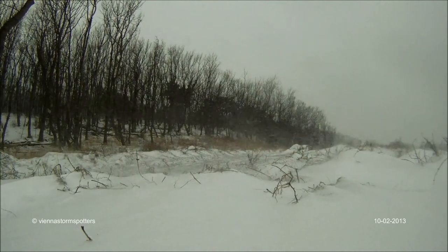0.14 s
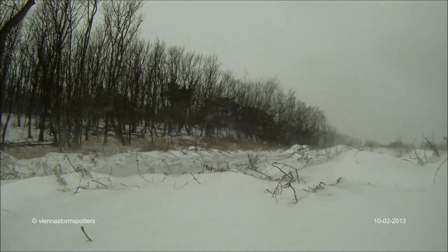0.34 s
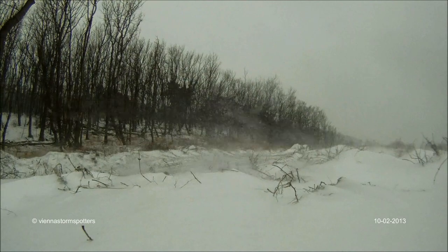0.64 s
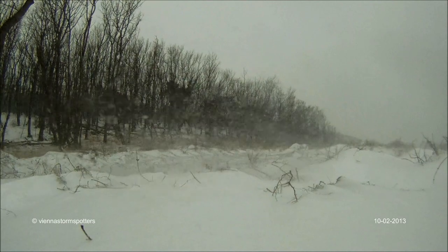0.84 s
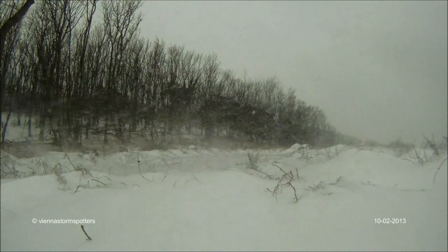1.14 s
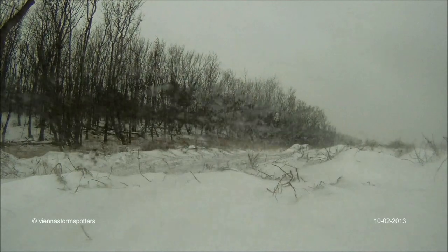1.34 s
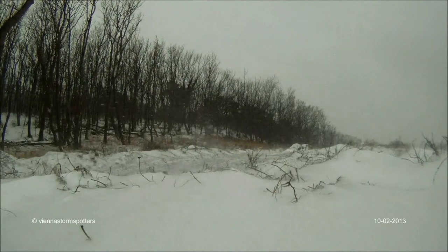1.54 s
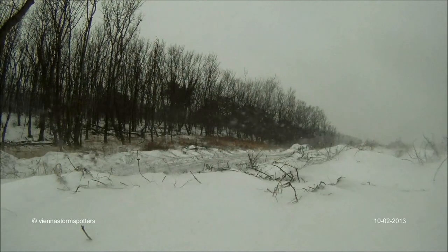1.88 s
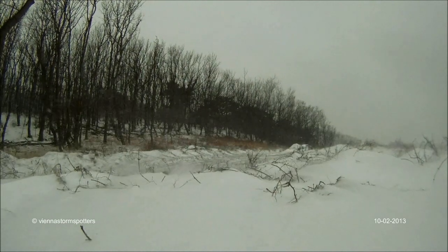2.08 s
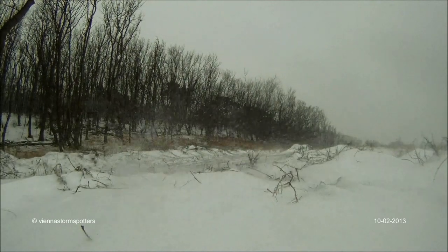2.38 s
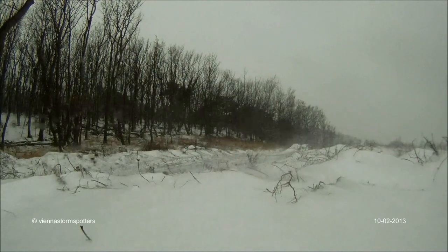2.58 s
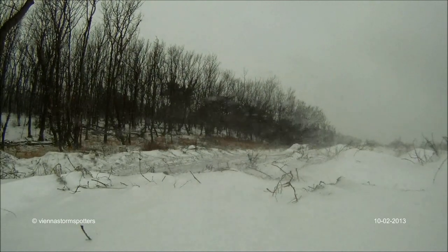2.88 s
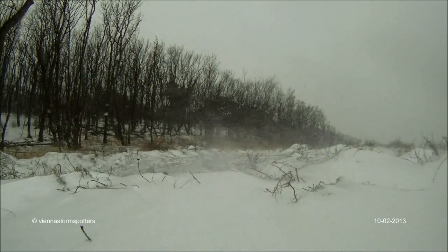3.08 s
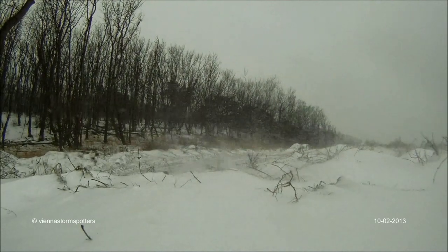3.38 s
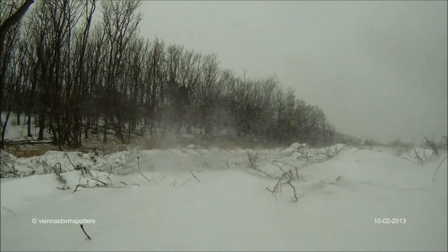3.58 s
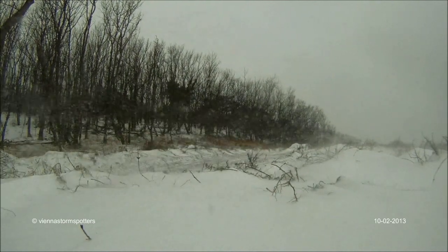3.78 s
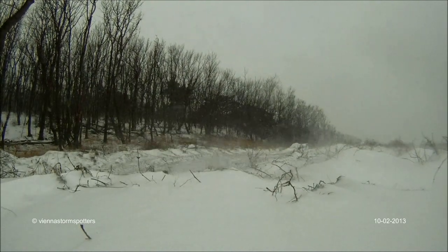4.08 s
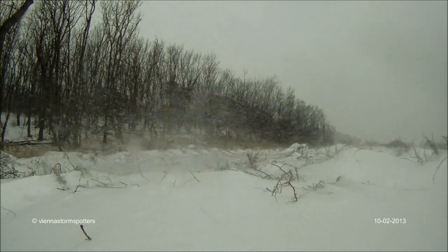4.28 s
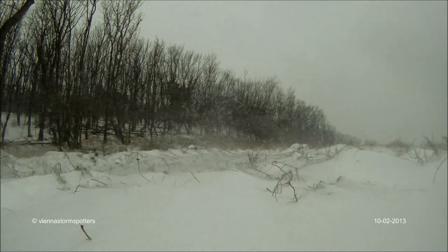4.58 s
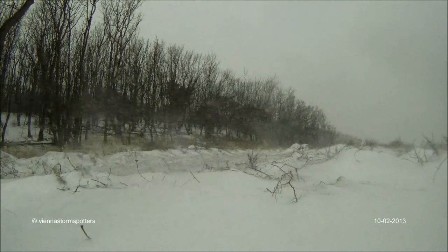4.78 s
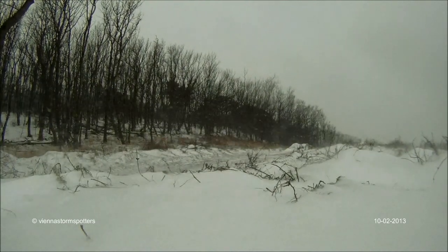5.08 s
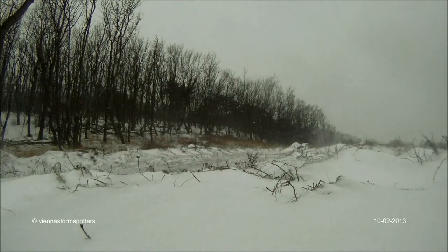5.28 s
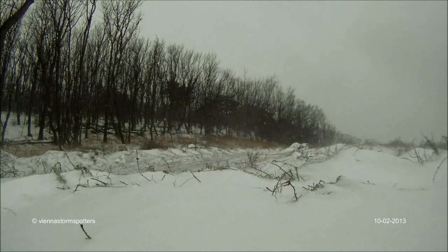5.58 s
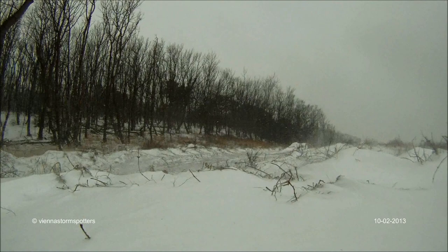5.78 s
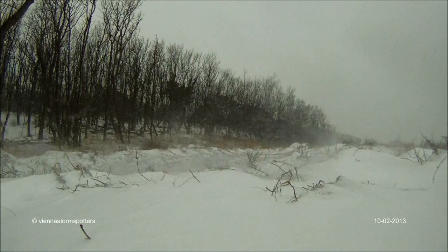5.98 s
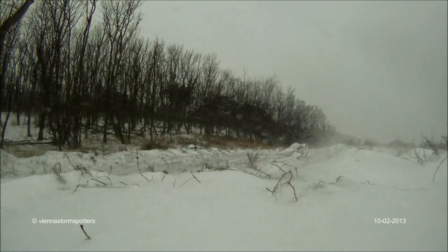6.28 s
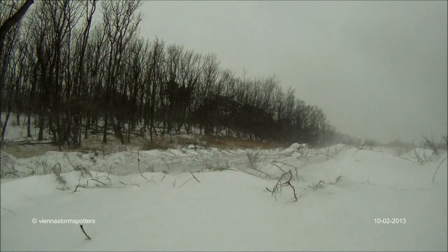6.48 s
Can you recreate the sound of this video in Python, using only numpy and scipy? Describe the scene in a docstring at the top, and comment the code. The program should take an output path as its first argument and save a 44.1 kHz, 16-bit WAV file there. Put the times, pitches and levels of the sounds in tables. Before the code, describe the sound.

Blowing snow rushes and fizzes against the microphone in uneven surges, over the rumble and hollow roar of gusty wind in an open field. Ice grains strike close up with sharp ticks and crackles. The wind dips briefly twice, drops for about a second late on, leaving faint taps of snow, and then returns with a few more ticks.

```python
"""Snowstorm in an open field.

A turbulent stream blows straight at a microphone in a small housing. Eddies rumble on its
port, the air roars past, and gusts of drifting snow excite the resonances of the housing,
which rush and fizz. Now and then a hard ice grain strikes the microphone with a tick."""
import sys
import numpy as np
from scipy import signal
from scipy.fft import rfft, irfft
from scipy.io import wavfile

SR = 44100
rng = np.random.default_rng(int(sys.argv[2]) if len(sys.argv) > 2 else 0)


def to_wav(s):
    """Save 16-bit WAV."""
    ch = np.atleast_2d(s).T  # columns
    pcm = np.round(np.clip(ch, -1, 1) * 32767)  # PCM
    wavfile.write(sys.argv[1], SR, pcm.astype(np.int16))


N = 292824
TIME = np.arange(N) / SR
HZ = np.fft.rfftfreq(N, 1 / SR)


def gain_of(db):
    """The decibel scale: 20 dB is a factor of ten in amplitude."""
    return 10 ** (np.asarray(db) / 20)


def unit_rms(x):
    """Normalisation to a mean power of 1."""
    return x / np.sqrt(np.mean(x ** 2) + 1e-20)


def swell(centre_s, length_s):
    """A Gaussian envelope, length_s wide at 1/e of its peak."""
    return np.exp(-np.minimum((2 * (TIME - centre_s) / length_s) ** 2, 20))


def spectrum(points):
    """A magnitude response, interpolated in decibels over log frequency."""
    hz, db = np.transpose(points)
    return gain_of(np.interp(np.log(HZ + 1), np.log(hz), db))


def resonances(modes):
    """The magnitude response of steep-sided resonances whose powers add."""
    powers = (gain_of(db) ** 2 / (1 + ((HZ - hz) / width) ** 2) ** np.pi for hz, width, db in modes)
    return np.sqrt(sum(powers))


def colour(x, gain):
    """Minimum-phase filtering is causal, so resonances ring after each impact; the result has rms 1."""
    log_gain = np.log(np.maximum(gain, 1e-5))
    phase = -signal.hilbert(np.r_[log_gain, log_gain[-2:0:-1]]).imag[:len(HZ)]
    return unit_rms(irfft(rfft(x) * np.exp(log_gain + 1j * phase), N))


def noise(gain):
    """Spectral shaping of white noise, at rms 1."""
    return colour(rng.standard_normal(N), gain)


def flutter(rate_hz):
    """Random modulation: band-limited noise that wavers up to about rate_hz."""
    return noise(HZ / (HZ + 8) / (1 + (HZ / rate_hz) ** 2))


def grains(per_s, spread_db):
    """Shot noise: independent impacts, many small and a few large."""
    size = gain_of(spread_db * np.minimum(rng.exponential(1, N), 4.5))
    return unit_rms(size * rng.choice([-1, 1], N) * (rng.random(N) < per_s / SR))


def pelting(level_db, per_s, spread_db, crowding):
    """Rate-modulated shot noise: impacts come thicker as the level rises, at constant mean power."""
    rate = np.minimum(per_s * gain_of(crowding * (level_db - np.median(level_db))), SR)
    return grains(rate, spread_db) / np.sqrt(rate / per_s)


def hiss(level_db=-64):
    """White noise lays a faint, even floor under the lulls."""
    return gain_of(level_db) * rng.standard_normal(N)


# Low response of the housing to flakes and powder: frequency_hz, gain_db
RUSH_SPECTRUM = [(600, -21.5), (1000, -17), (1250, -9), (1430, 0), (1540, -1), (1700, -6), (1900, -2),
                 (2110, 1), (2350, -6), (2600, -13), (2950, -22), (4000, -29), (6000, -48.5)]
# High resonances of the housing under the same impacts: centre_hz, width_hz, gain_db
FIZZ_MODES = [(9500, 410, -9), (9920, 330, 2.5), (10500, 235, -1.5), (11130, 570, -19), (12750, 450, -24),
              (13460, 260, -2.5), (14150, 340, -1), (15000, 740, -13.5)]

def flake_taps(level_db=-51, per_s=25, fizz_db=-10):
    """Impulse response: single flakes ring the housing, and stand out when the masking wind drops."""
    hits = grains(per_s, spread_db=0.5)
    rush = colour(hits, spectrum(RUSH_SPECTRUM))
    fizz = gain_of(fizz_db) * colour(hits, resonances(FIZZ_MODES))
    return gain_of(level_db) * (rush + fizz)


# Grains that skid along the housing: centre_s, highest_rms_db
SKIDS = [(5.535, -41), (5.715, -44), (5.794, -48), (5.852, -37.5)]
# Resonances of their thin squeak: centre_hz, width_hz, gain_db
SKID_MODES = [(5150, 330, 1), (6900, 450, -3)]

def skids(length_s=0.0076):
    """Friction noise: short scrapes excite two high resonances."""
    envelope = sum(gain_of(db) * swell(centre_s, length_s) for centre_s, db in SKIDS)
    return envelope * noise(resonances(SKID_MODES))


# Strength of the wind: time_s, level_db
WIND = [(0, 2.5), (0.78, 0.57), (0.85, -5.7), (1.03, 2.5), (1.72, -1), (2.27, -2.5), (2.65, 2.5),
        (3.2, -0.5), (3.97, -1.45), (4.34, -4.5), (4.38, -9), (4.49, 0.34), (5.18, 3), (5.45, -9),
        (6.15, -11), (6.26, -0.7), (6.64, -1.5)]

def wind_strength():
    """Unsteady flow, in dB: the wind blows hard, dips twice, sinks into a long lull and picks up."""
    time_s, level_db = np.transpose(WIND)
    return np.interp(TIME, time_s, level_db)


# Big eddies that buffet the housing: centre_s, length_s, rumble_lift_db, roar_lift_db
BUFFETS = [(0.12, 0.3, 5, 4.5), (0.45, 0.22, 3.7, 2.5), (0.83, 0.17, 4.5, 9), (1.01, 0.14, 1.5, -0.5),
           (1.51, 0.28, 2.5, 2.5), (1.944, 0.14, 4, 5), (2.18, 0.33, 5.5, 6.5), (2.59, 0.33, 1, 4),
           (2.86, 0.073, 2.5, -1), (3.09, 0.079, 2, 0.5), (3.42, 0.18, 3, 2.5), (3.617, 0.14, -1, 4.5),
           (3.78, 0.16, 4, 1.5), (4.683, 0.12, 2.8, 0.5), (5.7, 0.11, 0.7, 4.5), (5.88, 0.3, 4, 1.5),
           (6.285, 0.083, 2, 3.5)]

def buffeting():
    """Large-scale turbulence: each passing eddy lifts the rumble and the roar, in dB."""
    return sum(np.outer([rumble_db, roar_db], swell(centre_s, length_s))
               for centre_s, length_s, rumble_db, roar_db in BUFFETS)


# Pressure spectrum of the eddies: frequency_hz, density_db
RUMBLE_SPECTRUM = [(8, -30), (22, -2.5), (35, -1), (52, 0.5), (75, -3), (100, -9), (118, -10), (140, -2),
                   (158, -11.5), (180, -24), (300, -33), (900, -74)]

def eddy_rumble(wind_db, buffet_db, base_db=-35.0, wind_slope=0.61, lump_db=1.33):
    """Turbulent pressure fluctuations on the port make a low, lumpy rumble."""
    level_db = base_db + wind_slope * wind_db + buffet_db + lump_db * flutter(18)
    return gain_of(level_db) * noise(spectrum(RUMBLE_SPECTRUM))


# Spectrum of the passing air: frequency_hz, density_db
ROAR_SPECTRUM = [(100, -20.5), (190, -15), (255, -4), (335, -11), (400, -2), (460, 1.5), (530, -0.5),
                 (640, -6.5), (850, -6), (1050, -9), (1600, -15.5), (3000, -56), (8000, -64)]

def air_roar(wind_db, buffet_db, swirl, base_db=-40, wind_slope=0.76, swirl_db=0.75):
    """Flow noise: the stream past the housing makes a dull, hollow roar that grows with the wind."""
    level_db = base_db + wind_slope * wind_db + buffet_db + swirl_db * swirl
    return gain_of(level_db) * noise(spectrum(ROAR_SPECTRUM))


# Sharp eddies: centre_s, peak_db, pitch_hz, length_s
JOLTS = [(.004, -21, 253, 0.015), (0.217, -28, 255, 0.014), (0.522, -22, 252, 0.0094),
         (0.588, -29, 253.5, .014), (.902, -19.5, 1560, 0.0065), (2.079, -11.5, 1480, 0.008),
         (2.143, -24, 1520, 0.057), (2.409, -21.5, 256, 0.01), (3.671, -24, 800, 0.0027),
         (3.689, -28, 255, 0.013)]

def jolts():
    """Transient excitation: a sharp eddy thumps the housing or makes the port hoot in a tone burst."""
    return sum(gain_of(db) * swell(centre_s, length_s) * np.cos(2 * np.pi * (hz * TIME + rng.random()))
               for centre_s, db, hz, length_s in JOLTS)


# Response of the port to a hard grain: frequency_hz, gain_db
TICK_SPECTRUM = [(500, -24), (1300, -48), (2150, -2), (2900, -14.5), (3550, 1.5), (4250, -2.5), (5100, 6.5),
                 (5550, 2.5), (6000, -9), (6800, 5), (7700, -5.5), (8500, -9), (10500, -27), (16000, -24)]
# Hard ice grains and the chips that trail them: time_s, peak_db, mean_chip_count
ICE_GRAINS = [(0.345, 4, 0), (0.9804, -17, 0), (1.151, -8, 0), (1.4163, -13, 0), (2.412, -3, 3),
              (2.432, -13, 0), (2.4682, -13.5, 0), (2.5904, -1.5, 0), (2.6334, -8, 0), (2.6384, -8.5, 0),
              (2.7101, 2.5, 0), (3.0898, -10, 0), (3.1609, -15, 0), (3.2123, -6, 0), (3.2405, -5, 1),
              (3.2736, -13, 1), (3.3438, -15, 0), (3.3549, -10.5, 2), (3.4343, 1, 0), (3.439, -3, 0),
              (3.4459, 1, 0), (3.464, -6, 2), (3.4818, -5, 0), (3.4983, -3.5, 0), (3.5037, -7, 0),
              (3.5408, -7, 0), (3.5646, -3.5, 1), (3.7727, -1.5, 0), (4.456, -6, 0), (4.562, -11.5, 1),
              (4.5795, -13, 0), (5.043, -10, 1), (5.045, -9.5, 1), (5.0712, -13, 0), (5.149, -13, 0),
              (5.2366, -19, 0), (6.2847, -13, 0), (6.289, -12, 2), (6.3233, -6.5, 0), (6.33, -6, 0)]

def ice_ticks(smear_s=0.00042, chip_db=-12.5, chip_spread_db=2, chip_lag_s=0.006):
    """Impact and dispersion: the port colours each click and spreads it over about a millisecond."""
    clicks, chips_per_s = np.zeros(N), np.zeros(N)
    for time_s, peak_db, chip_count in ICE_GRAINS:
        at = round(time_s * SR)
        clicks[at] += gain_of(peak_db)
        chips_per_s[at:] += chip_count / chip_lag_s * np.exp(-TIME[:N - at] / chip_lag_s)
    chip_size = gain_of(chip_db + chip_spread_db * rng.standard_normal(N))
    clicks += chip_size * (rng.random(N) < chips_per_s / SR)
    # quadratic phase: the treble arrives slightly ahead of the lower resonances
    port = spectrum(TICK_SPECTRUM) * np.exp(1j * np.pi * smear_s * (HZ - 5500) ** 2 / 4000)
    return irfft(rfft(clicks) * port, N) / abs(irfft(port, N)).max()


# Flurries that sweep over the housing: start_s, length_s, powder_lift_db, coarse_lift_db
FLURRIES = [(0.01, 0.21, 6, 5), (0.325, 0.19, 3.5, 7), (0.516, 0.25, 6.2, 4), (0.859, 0.08, 5.9, 10.5),
            (0.945, 0.1, 1, 8.5), (1.07, 0.399, 4.8, 6), (1.441, 0.18, 9.3, 11), (1.595, 0.44, 7.5, 4.5),
            (2.017, 0.2, 10.5, 6), (2.385, 0.125, 6.5, 11), (2.554, 0.11, 14, 15.5), (2.63, 0.09, 6, 0),
            (2.71, 0.17, 6, 5), (2.86, 0.15, 8.5, 8.6), (3.017, 0.15, 3.5, 8.5), (3.179, 0.22, 3.7, 6.7),
            (3.404, 0.2, 4, 10.5), (3.83, 0.19, 6, 8.3), (4.001, 0.14, 4.5, 2.5), (4.419, 0.23, 3, 8),
            (4.86, 0.24, 3.3, 6), (5.109, 0.085, 5, 5)]

def flurries(attack_s=0.033, release_s=0.04, front_share=0.89):
    """Amplitude envelopes, in dB: each flurry lifts the snow quickly, builds a little and drops away."""
    lifts_db = np.zeros((2, N))
    for start_s, length_s, powder_db, coarse_db in FLURRIES:
        age_s = TIME - start_s
        envelope = np.clip(np.minimum(age_s / attack_s, (length_s - age_s) / release_s), 0, 1)
        build = front_share + (1 - front_share) * age_s / length_s
        lifts_db += np.outer([powder_db, coarse_db], envelope * build)
    return lifts_db


def snow_load(wind_db):
    """Wind transport: powder and coarse snow grow with the wind, leap in flurries and waver together."""
    powder_lift_db, coarse_lift_db = flurries()
    waver_db = flutter(9)
    powder_db = -32.0 + 1.03 * wind_db + powder_lift_db + 0.5 * waver_db
    coarse_db = -40.0 + 1.15 * wind_db + coarse_lift_db + waver_db
    return powder_db, coarse_db


# Resonances of the housing under coarse snow: centre_hz, width_hz, gain_db
PATTER_MODES = [(2550, 1550, -5), (3540, 465, 2.5), (4370, 670, -3), (5130, 350, -1.5), (6860, 440, -3.5),
                (7620, 570, -8), (8440, 510, -4)]

def coarse_snow(coarse_db, swirl, patter_db=-2.5, crackle_db=-10, swirl_db=1.74):
    """Filtered shot noise: larger flakes patter on the housing; thick drift crackles on the port."""
    dense_hits = pelting(coarse_db, per_s=9000, spread_db=3.5, crowding=0.6)
    sparse_hits = pelting(coarse_db, per_s=260, spread_db=3.6, crowding=0.54)
    patter = gain_of(patter_db) * colour(dense_hits, resonances(PATTER_MODES))
    crackle = colour(sparse_hits, spectrum(TICK_SPECTRUM))
    crackle *= gain_of(crackle_db + 0.061 * (coarse_db - np.median(coarse_db)))
    return gain_of(coarse_db + swirl_db * swirl) * (patter + crackle)


# Clumps of powder that hit at once: centre_s, lift_db, length_s
CLUMPS = [(0.18, 4, 0.03), (0.73, 3, 0.025), (0.902, 9, 0.007), (1.52, 3.5, 0.025), (1.981, 5.5, 0.008),
          (2.079, 8, 0.008), (2.2, 10, 0.01), (2.248, 8, 0.018), (2.75, 3.5, 0.025), (3.671, 5, 0.007),
          (5.29, 4, 0.025), (5.53, 9, 0.005), (5.911, 6, 0.004), (6.033, 10, 0.005), (6.525, 6, 0.005)]

def powder(powder_db, coarse_db, swirl, fizz_db=-12.0, swirl_db=1.3):
    """Modal excitation: fine snow rings the housing's low resonances (rush) and high ones (fizz)."""
    # thin snow in the lulls arrives in more separate puffs
    puffiness = gain_of(0.12 * (np.median(powder_db) - powder_db))
    clump_db = sum(lift_db * swell(centre_s, length_s) for centre_s, lift_db, length_s in CLUMPS)
    level_db = powder_db + swirl_db * puffiness * swirl + clump_db
    impacts = gain_of(level_db) * pelting(powder_db, per_s=9000, spread_db=2.5, crowding=1.1)
    impact_rms = np.sqrt(np.mean(impacts ** 2))
    # the fizz rises a little with the share of coarse snow
    coarse_share_db = coarse_db - powder_db
    fizz_lift_db = 0.096 * (coarse_share_db - coarse_share_db.mean())
    rush = colour(impacts, spectrum(RUSH_SPECTRUM))
    fizz = gain_of(fizz_db + fizz_lift_db) * colour(impacts, resonances(FIZZ_MODES))
    return impact_rms * (rush + fizz)


def scene():
    """Superposition: one turbulent stream drives air and snow, heard alike in both channels."""
    wind_db = wind_strength()
    swirl = flutter(47)
    rumble_lift_db, roar_lift_db = buffeting()
    powder_db, coarse_db = snow_load(wind_db)
    wind = eddy_rumble(wind_db, rumble_lift_db) + air_roar(wind_db, roar_lift_db, swirl) + jolts()
    snow = powder(powder_db, coarse_db, swirl) + flake_taps() + coarse_snow(coarse_db, swirl)
    mono = wind + snow + ice_ticks() + skids() + hiss()
    return np.array([mono, mono])


def record(dry, notch_hz=5980, width_hz=300, depth_db=3, cutoff_hz=15600):
    """Cancellation in the port weakens a narrow band; the hardest ticks clip; a low-pass follows."""
    notch = gain_of(-depth_db * np.exp(-((HZ - notch_hz) / width_hz) ** 2))
    heard = irfft(rfft(dry) * notch, N)
    low_pass = signal.firwin(255, cutoff_hz, window=("kaiser", 8), fs=SR)
    return signal.oaconvolve(np.clip(heard, -1, 1), low_pass[None], "same")


dry = scene()
out = record(dry)
to_wav(out)
```